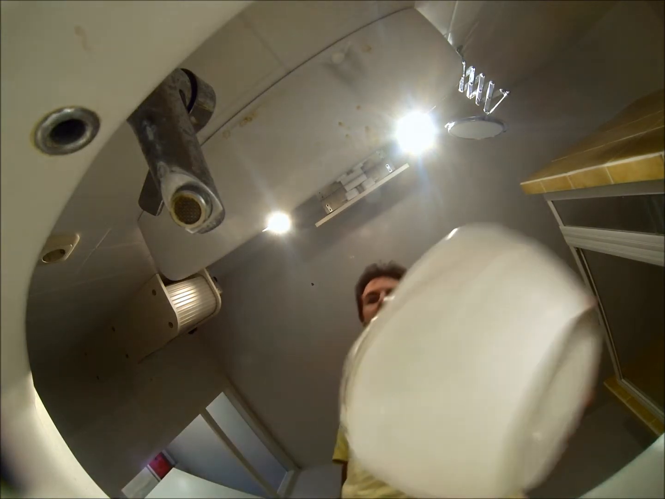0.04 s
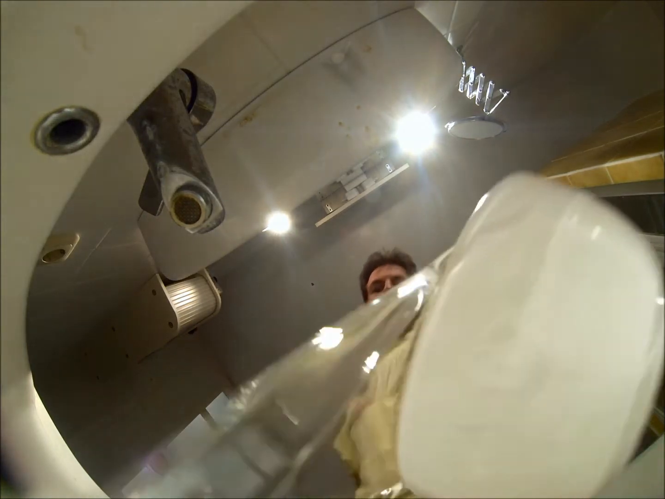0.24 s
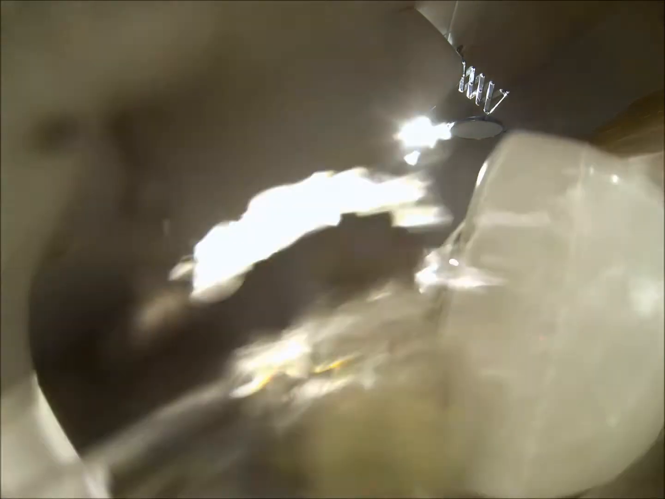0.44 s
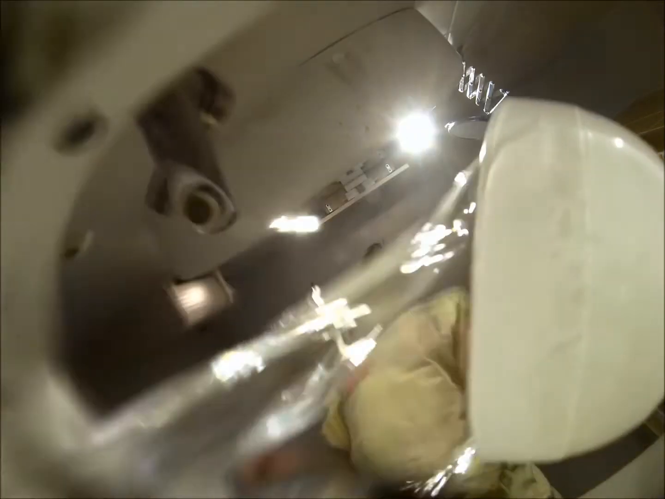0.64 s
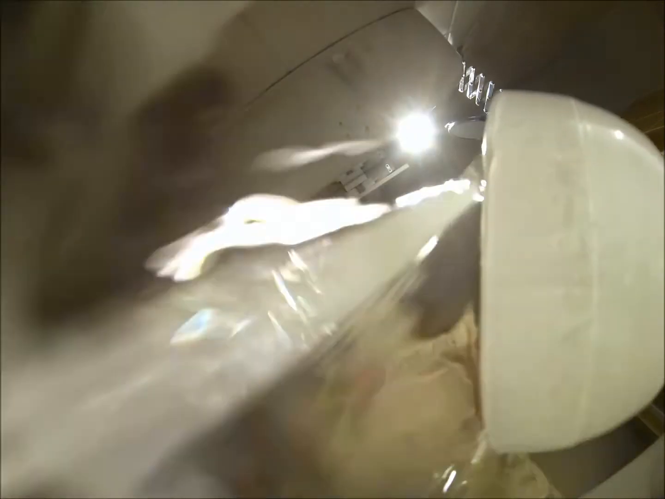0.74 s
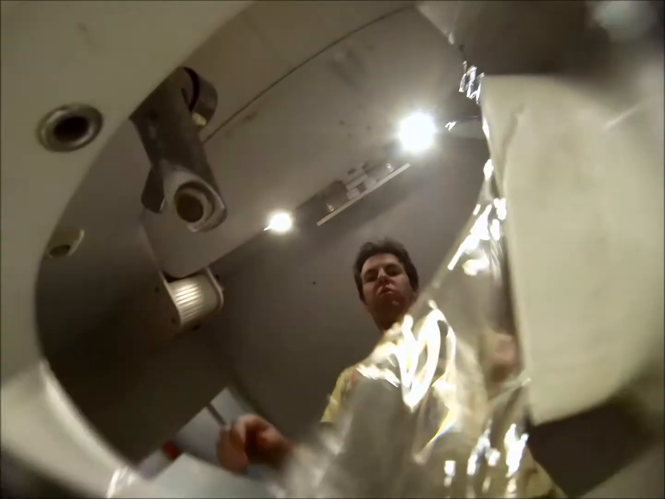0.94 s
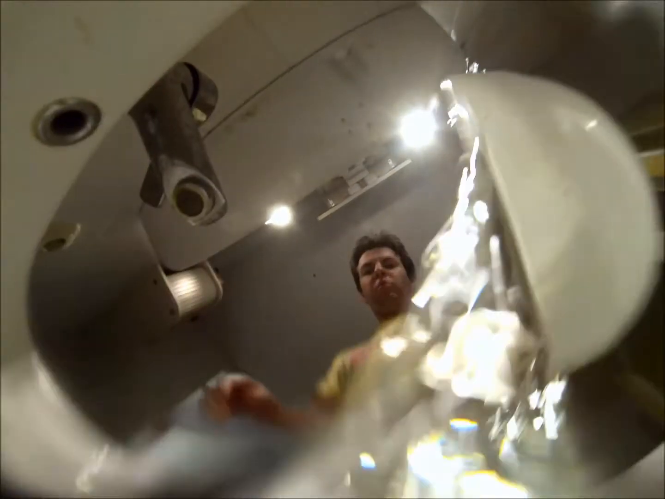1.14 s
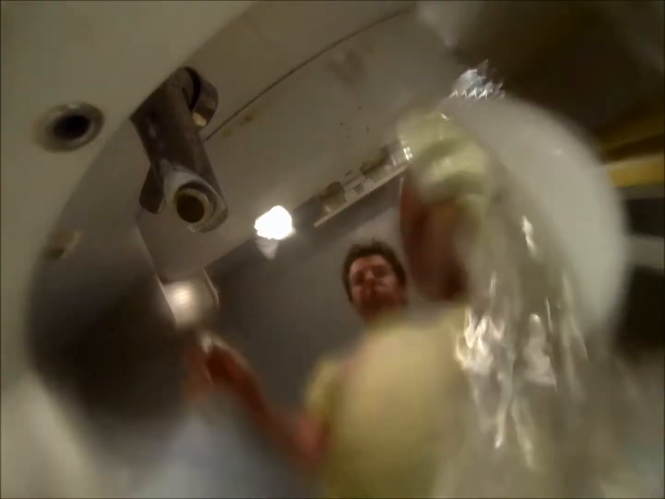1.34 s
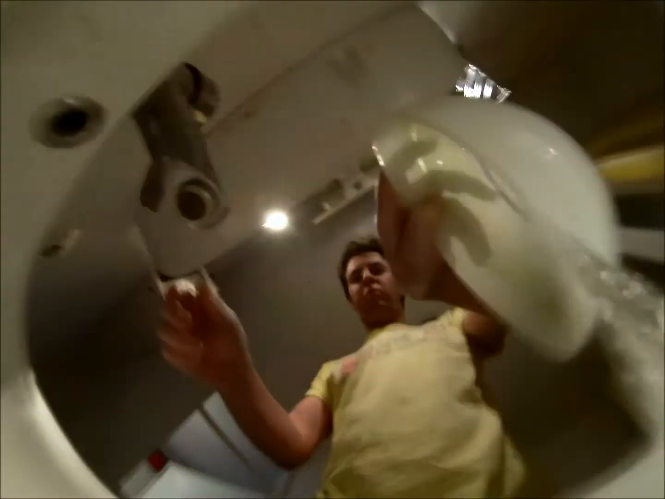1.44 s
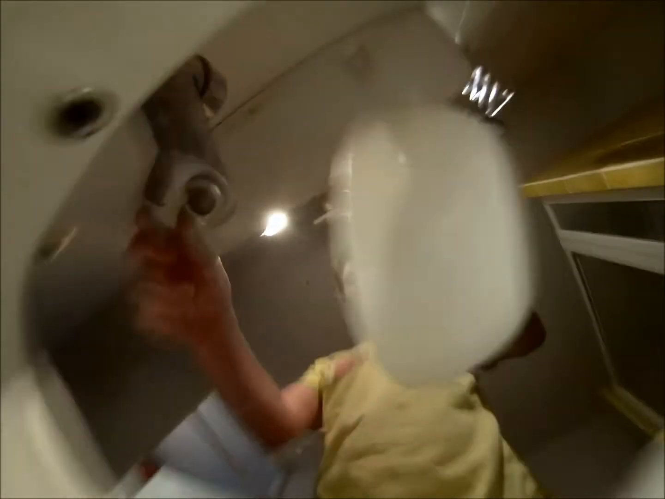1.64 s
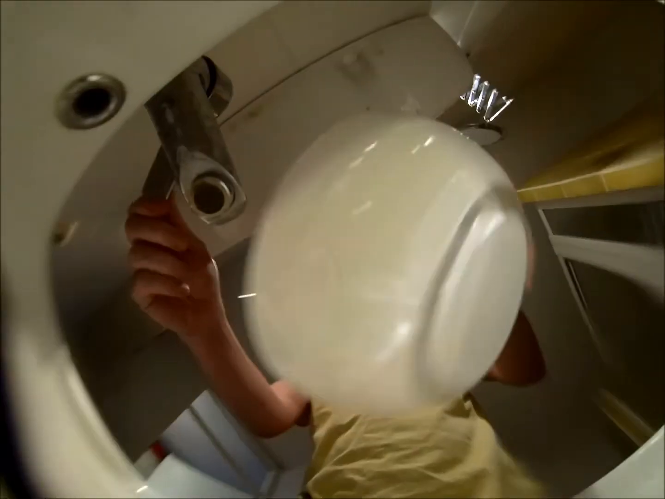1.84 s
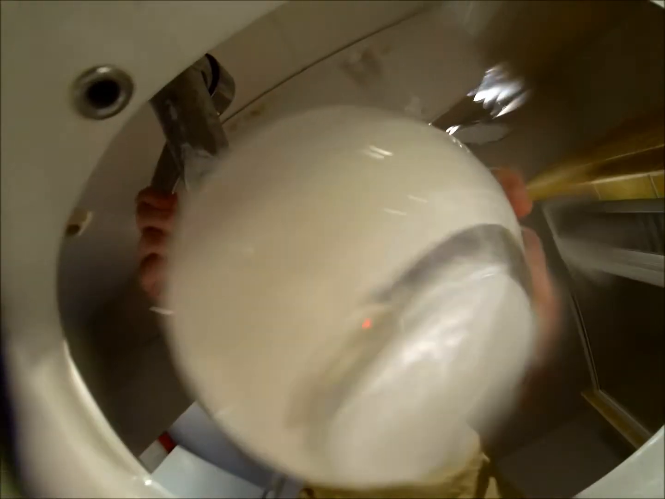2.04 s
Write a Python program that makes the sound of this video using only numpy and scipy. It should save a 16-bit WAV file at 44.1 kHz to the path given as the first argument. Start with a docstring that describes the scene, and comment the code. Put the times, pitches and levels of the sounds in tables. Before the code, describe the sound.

A bowlful of water splatters into a sink right onto the microphone, ending in low glugs.

```python
"""In a sink, a bowl of water is emptied over a cased microphone. Each slap of the stream excites the
modes of the case, and the sloshing water rumbles. Entrained bubbles ring as small spring-mass
oscillators: large ones right beside the case, over a wash of smaller ones. The nearest overload the
microphone. When the pour stops the water gurgles away, leaving a faint rising hollow tone."""
import sys
import numpy as np
from scipy import signal
from scipy.io import wavfile

SR = 44100
rng = np.random.default_rng(int(sys.argv[2]) if len(sys.argv) > 2 else 0)


def generate_wav(signal):
    """Clip the signal to [-1, 1] and save it as 16-bit WAV at the path in sys.argv[1]."""
    frames = np.transpose(np.atleast_2d(signal))
    scaled = np.clip(frames, -1, 1) * 32767
    pcm = np.round(scaled).astype(np.int16)
    wavfile.write(sys.argv[1], SR, pcm)


N = 92610
T = np.arange(N) / SR

# upper modes of the case: f/Hz, level/dB, T60/s
KNOCK_MODES = [(1060,-13,0.014),(1480,-5.5,0.023),(1662,-0.5,0.0057),(2210,-15,0.021),(3230,-9.5,0.0098),(4770,-25.5,0.026)]
# low modes of the case, which need a heavy blow: f/Hz, level/dB, T60/s
THUMP_MODES = [(49.7,-5.5,0.024),(154,-8.5,0.031),(334.3,-12,0.066),(450,-2.5,0.0074),(631,-6.5,0.011)]
# envelope of the splashing flow: t/s, level/dB
FLOW_LEVEL = [(.22,-69),(.295,-27.5),(.41,-33),(.47,-27),(.60,-25),(.69,-35),(.87,-22),(1.0,-35),(1.07,-32),(1.18,-23),(1.27,-33),(1.35,-23),(1.42,-26.5),(1.49,-26),(1.565,-35.5),(1.60,-50),(2.1,-58)]


def near_bubbles():
    """Bubble resonance: air is the spring, water the mass. Each bubble also snaps and shakes the case."""
    # bubbles beside the case: t/s, f/Hz, level/dB
    births = [(.2945,2950,-8.5),(0.313,2420,-10.5),(0.3178,3000,-3),(.3365,2350,-10.5),(0.3402,3270,-3.5),
              (0.3599,2870,-6),(.3640,3210,6),(0.368,1480,0.5),(.379,1970,-8),(.3930,2070,-10),(0.4247,3800,-7),(.4270,1315,-8.5),
              (0.4486,5310,-3.5),(0.451,2780,-6),(0.4572,1480,-2.5),(0.487,5030,-8),(0.4879,1360,-5.5),(0.4984,1306,-8.5),(0.5007,5470,-4.5),
              (0.566,4950,-10.5),(0.5706,6220,-8.5),(.6206,4500,-6),(0.6205,482,0.5),(0.6217,1410,-2.5),(.6500,1780,0.5),(0.6644,3220,-5.5),(0.7141,3880,2),(0.714,1480,-7),
              (0.7841,1460,-8),(0.8089,1547,-8.5),(0.8417,1383,-1.5),(0.8561,1055,-2),
              (0.878,1420,-4),(0.88,3530,0),(0.891,3570,-2),(0.8903,1440,-5),(.9080,1810,-4),(0.9387,4230,-6),(0.942,2370,-8.5),(0.9615,2340,-12),
              (1.0561,1980,-7),(1.0921,915,-6.5),(1.1008,1236,-9),(1.1116,5300,-11),(1.1338,4350,-7),(1.1419,1730,-4.5),
              (1.1531,1760,1.5),(1.1610,2970,-2),(1.1708,6340,-3),(1.175,3200,-5),(1.1860,5800,-0.5),(1.1956,2900,-4.5),(1.2018,3840,-2),
              (1.2126,2770,-5),(1.2268,844,-9.5),(1.248,2950,-5.5),(1.2470,6680,-7.5),(1.2649,3130,-5),(1.3041,2570,-1),
              (1.3123,1520,-1),(1.323,1466,-0.5),(1.361,2850,2),(1.5663,1566,11.5),(1.635,3750,-20),(1.7273,1450,-17),(2.079,1520,-33)]
    swell_s = 0.0023  # time to peak up to 1 kHz; smaller, higher bubbles peak sooner
    rings = sum(bubble_pulse(s, hz, db, swell_s * min((1000 / hz) ** 0.58, 1)) for s, hz, db in births)
    s, hz, db = np.transpose(births)
    snaps = spray(s, db - 22.5 + 20 * np.log10(hz / hz.max()))  # small bubbles snap harder
    return rings + snaps + strike(KNOCK_MODES, s, db - 11.5) + strike(THUMP_MODES, s, db - 29.5)


def bubble_pulse(s, hz, db, swell_s):
    """Damped oscillation: an air pocket swells, sags in pitch and is choked off by the water."""
    choke = 1.58  # 1 is a plain decay, 2 a quick stop
    age = np.clip((T - s) / swell_s, 0, 10)
    sag = 0.027 + 0.011 * rng.standard_normal()  # share of the pitch lost during the swell
    envelope = age * np.exp(-age ** choke / choke)
    phase = 2 * np.pi * hz * swell_s * age * (1 - sag * (age / 2 - 1))
    return -from_db(db) * envelope * np.sin(phase)


def slaps():
    """Impact excitation: lumps of water ring the case, thump it and throw a brief spray."""
    # water striking the case: t/s, knock level/dB, thump level/dB, spray level/dB
    impacts = [(0.2214,-10.5,-10,-19),(0.2682,-25,-54,-25.5),(.3400,-27,-6,-20.5),(0.3629,-26,-17,-32),(0.447,-7,-18,-19.5),(0.621,-11.5,-2.5,-18.5),(.6500,3,-1,-34),(0.709,-3,-7,-30),
               (1.0914,-4.5,-16.5,-21.5),(1.304,-3,-20,-35),(1.3137,1.5,-7,-27.5),(1.3242,0.5,-11.5,-28),(1.4977,-18,-17,-42),(1.546,-13.5,-19,-37),(1.7967,-11,-11.5,-50)]
    s, knock_db, thump_db, spray_db = np.transpose(impacts)
    return strike(KNOCK_MODES, s, knock_db) + strike(THUMP_MODES, s, thump_db) + spray(s, spray_db)


def spray(s, db, t60_s=0.02, band_hz=(3000, 7700)):
    """Broadband transients: bursts of bright noise that decay exponentially."""
    decay = np.exp(-np.log(1000) / (t60_s * SR))
    envelope = signal.lfilter([1], [1, -decay], clicks_at(s, db) + 1e-18)
    return envelope * rms_one(butterworth(rng.standard_normal(N), band_hz, "band"))


def splash(bubbles_per_s=1500, size_spread_db=7):
    """Incoherent superposition: small bubbles ring at random over a churning wash; both follow the flow."""
    # gain of the small bubbles by pitch: f/Hz, level/dB
    swarm_spectrum = [(700,-20),(1400,3.5),(2100,2),(3200,9),(6500,3.5),(9000,2.5),(13000,-6)]
    # spectral density of the churning water: f/Hz, level/dB
    wash_spectrum = [(450,-4.5),(800,-0.5),(1500,10),(2200,0),(3200,12),(5000,-11),(10000,-11),(15000,-64)]
    flow_db, = in_time(FLOW_LEVEL)
    pitches = np.geomspace(750, 12000, 36)
    share = pitches ** -0.5  # the highest come as rare ticks
    born = rng.random(N) < bubbles_per_s / SR
    size_db = size_spread_db * np.minimum(rng.exponential(1, N), np.log(20))
    kicks = born * from_db(size_db) * rng.choice([-1, 1], N)
    pitch_index = rng.choice(len(pitches), N, p=share / share.sum())
    swarm = 0
    for k, hz in enumerate(pitches):
        rings = ring(kicks * (pitch_index == k), hz, t60=29.5 / hz)
        softened = butterworth(rings, min(1.3 * hz, SR / 3))
        swarm += from_db(at_hz(swarm_spectrum, hz)) * softened
    wash = banded_noise(wash_spectrum, flicker_db=2.5, flicker_hz=20)
    return from_db(flow_db) * (rms_one(swarm) + from_db(-5) * wash)


def slosh():
    """Pressure fluctuation: water heaving against the case rumbles while the pour lasts."""
    # envelope of the rumble: t/s, level/dB
    rumble_level = [(.21,-61.5),(.27,-39),(.58,-42.5),(.64,-35.5),(.98,-29),(1.21,-26),(1.32,-27),(1.40,-27.5),(1.50,-27.5),(1.56,-21),(1.59,-68),(1.7,-92)]
    # its spectral density: f/Hz, level/dB
    rumble_spectrum = [(25,1),(110,0.5),(165,2),(230,-10),(650,-14),(1200,-39),(3000,-73)]
    rumble_db, = in_time(rumble_level)
    return from_db(rumble_db) * banded_noise(rumble_spectrum, flicker_db=2, flicker_hz=88)


def gurgle(kicks_per_s=200, top_hz=535):
    """Randomly excited resonators: draining water rings low air pockets over a soft rush."""
    # envelope of the draining: t/s, level/dB
    drain_level = [(1.40,-79),(1.45,-31.5),(1.55,-27),(1.585,-45),(1.61,-44),(1.635,-33),(1.715,-29.5),(1.75,-23),(1.82,-23),(1.88,-30),(1.94,-47),(2.1,-63)]
    # resonances of the air pockets: f/Hz, level/dB, T60/s
    pocket_modes = [(116,-9,.07),(189,2,0.081),(296,1.5,0.023),(460,-1.5,0.087)]
    # spectral density of the rush: f/Hz, level/dB
    rush_spectrum = [(25,3),(120,11.5),(750,-4.5),(1050,2),(1450,6),(2200,-8.5),(3500,-8.5),(6000,-29),(14000,-61)]
    drain_db, = in_time(drain_level)
    pockets = 0
    for hz, db, t60 in pocket_modes:
        kicks = (rng.random(N) < kicks_per_s / SR) * rng.choice([-1, 1], N)
        pockets += from_db(db) * ring(kicks, hz, t60)
    glugs = rms_one(butterworth(pockets, top_hz, order=8))
    rush = from_db(-5) * banded_noise(rush_spectrum, flicker_db=1.5, flicker_hz=250)
    return from_db(drain_db) * (glugs + rush)


def big_glugs(swell_s=0.004):
    """Large air pockets resonate low; at its peak each gulp rattles two modes of the case."""
    # gulps as the water runs off: t/s, f/Hz, level/dB
    gulps = [(1.442,152,-14),(1.486,152,-11.5),(1.628,260,-16.5),(1.653,404,-15),(1.677,410,-18),(1.744,436,-6.5),(1.764,184,-9),(1.78,430,-8),(1.797,380,-10),(1.812,450,-14.5),(1.82,186,-8),(1.84,218,-11.5)]
    s, _, db = np.transpose(gulps)
    pulses = sum(bubble_pulse(*gulp, swell_s) for gulp in gulps)
    return pulses + strike(KNOCK_MODES[:2], s + swell_s, db - 12)


def patter(drops_per_s=100, spread_db=14):
    """Shot noise: small drops strike the case at random, as hard as the flow is strong."""
    when, size = rng.random((int(drops_per_s * T[-1]), 2)).T
    s = when * T[-1]
    flow_db = np.interp(s, *np.transpose(FLOW_LEVEL))
    return strike(KNOCK_MODES, s, flow_db + 0.5 + spread_db * size)


def hollow_tone(width_hz=40):
    """Narrow-band noise: a hollow resonance climbs as the water runs off."""
    # path of the resonance: t/s, f/Hz, level/dB
    glide = [(1.70,450,-93),(1.78,460,-62),(1.88,480.5,-47),(1.95,523,-44.5),(2.1,590,-49)]
    hz, db = in_time(glide)
    phase = 2 * np.pi * np.cumsum(hz) / SR
    return from_db(db) * rms_one(drift(width_hz) * np.cos(phase) + drift(width_hz) * np.sin(phase))


def noise_floor():
    """Stationary noise: a faint, mostly low background."""
    # spectral density of the background: f/Hz, level/dB
    floor_spectrum = [(25,17),(95,-2.5),(1000,-28.5),(1600,-13),(2200,-26.5),(3000,-19.5),(5000,-28.5),(15000,-36)]
    return from_db(-53) * banded_noise(floor_spectrum, flicker_db=-0.5, flicker_hz=8.8)


def strike(modes, s, db):
    """Modal superposition: blows ring modes of alternating sign, a little differently each time."""
    scatter_db = rng.standard_normal((len(s), len(modes)))
    return sum((-1) ** k * ring(clicks_at(s, db + mode_db + scatter_db[:, k]), hz, t60)
               for k, (hz, mode_db, t60) in enumerate(modes))


def ring(clicks, hz, t60):
    """Damped resonator: a unit impulse starts a decaying sine of unit height."""
    r, w = np.exp(-np.log(1000) / (t60 * SR)), 2 * np.pi * hz / SR
    return signal.lfilter([0, np.sin(w)], [1, -2 * r * np.cos(w), r * r], clicks + 1e-18)


def banded_noise(spectrum, flicker_db, flicker_hz):
    """Amplitude modulation: third-octave noise bands flicker, partly together; unit power."""
    edges = 20 * 2 ** (np.arange(30) / 3)
    white, together = rng.standard_normal((2, N)), drift(flicker_hz)
    noise = 0
    for k, (low, high) in enumerate(zip(edges, edges[1:])):
        band_db = at_hz(spectrum, np.sqrt(low * high)) + flicker_db * (together + drift(flicker_hz))
        noise += from_db(band_db) * butterworth(white[k % 2], [low, high], "band")
    return rms_one(noise)


def drift(hz):
    """Low-passed noise: a slow random wander of unit power."""
    hop, settle = 40, 2000
    r = np.exp(-2 * np.pi * hz * hop / SR)
    white = rng.standard_normal(N // hop + settle + 2)
    slow = signal.lfilter([1], [1, -2 * r, r * r], white)[settle:]
    return np.interp(np.arange(N) / hop, np.arange(len(slow)), rms_one(slow))


def butterworth(x, hz, kind="low", order=2):
    """Filter with a maximally flat passband."""
    return signal.sosfilt(signal.butter(order, hz, kind, fs=SR, output="sos"), x)


def clicks_at(s, db):
    """One impulse for each time and level."""
    return np.bincount((s * SR).astype(int), from_db(db), N)


def in_time(rows):
    """Each column of a curve, interpolated sample by sample."""
    s, *columns = np.transpose(rows)
    return [np.interp(T, s, column) for column in columns]


def at_hz(spectrum, hz):
    """Level of a spectrum, interpolated on a log-frequency axis."""
    frequencies, levels = np.transpose(spectrum)
    return np.interp(np.log(hz), np.log(frequencies), levels)


def from_db(db):
    """Decibels to amplitude ratio."""
    return 10 ** (np.asarray(db) / 20)


def rms_one(x):
    """Scale to unit power."""
    return x / np.sqrt(np.mean(x ** 2) + 1e-20)


def scene():
    """Linear superposition: the pour, the draining and the background add in one channel."""
    pour = near_bubbles() + slaps() + splash() + slosh()
    draining = gurgle() + hollow_tone() + big_glugs()
    return (pour + draining + noise_floor() + patter())[None]


def record(dry, knee=30, stopband_hz=15500):
    """Saturation: the microphone flattens peaks at full scale, then a low-pass cuts the top."""
    flattened = dry / (1 + np.abs(dry) ** knee) ** (1 / knee)
    return signal.sosfilt(signal.cheby2(12, 60, stopband_hz, fs=SR, output="sos"), flattened)


dry = scene()
out = record(dry)
generate_wav(out)
```